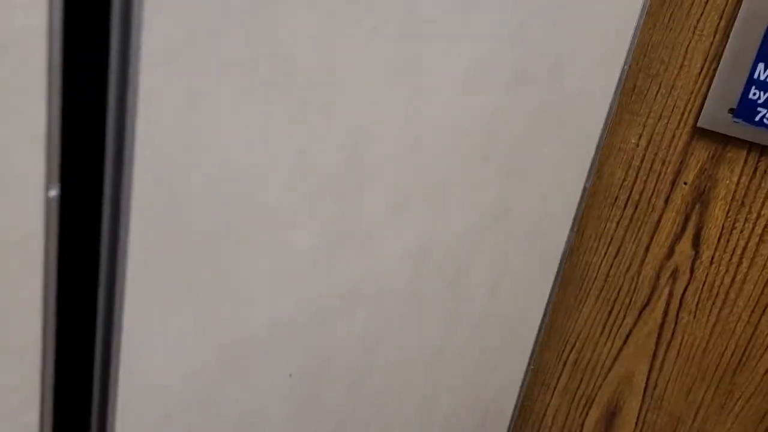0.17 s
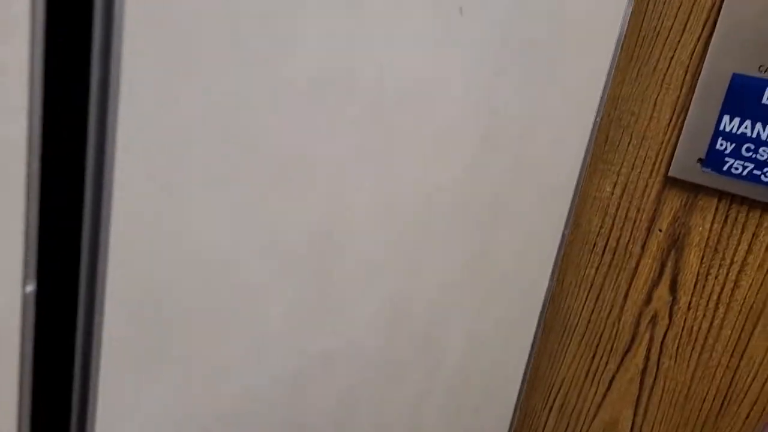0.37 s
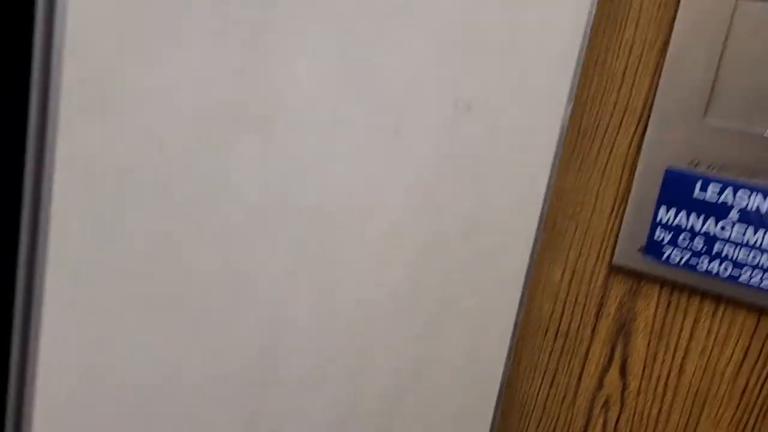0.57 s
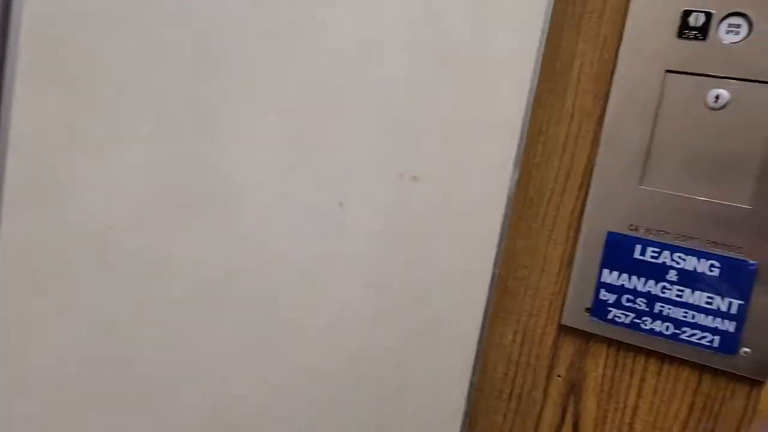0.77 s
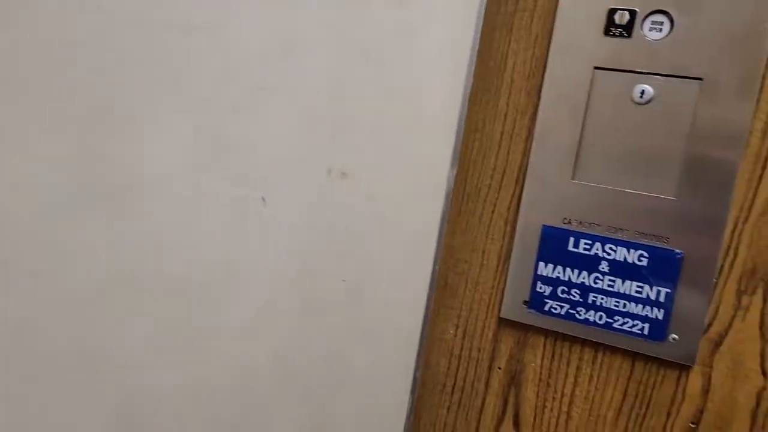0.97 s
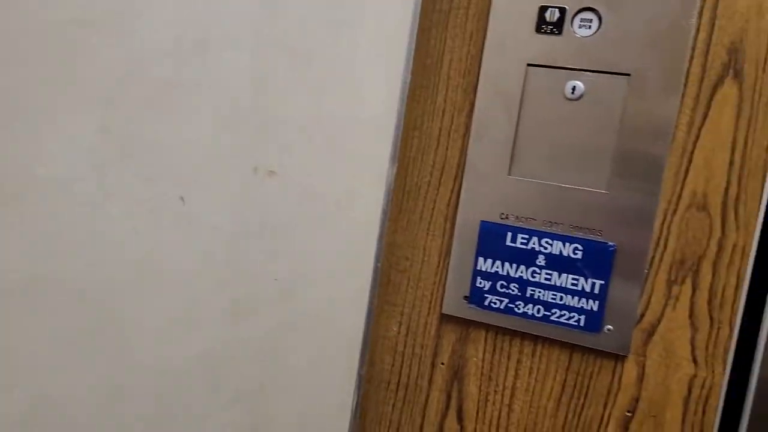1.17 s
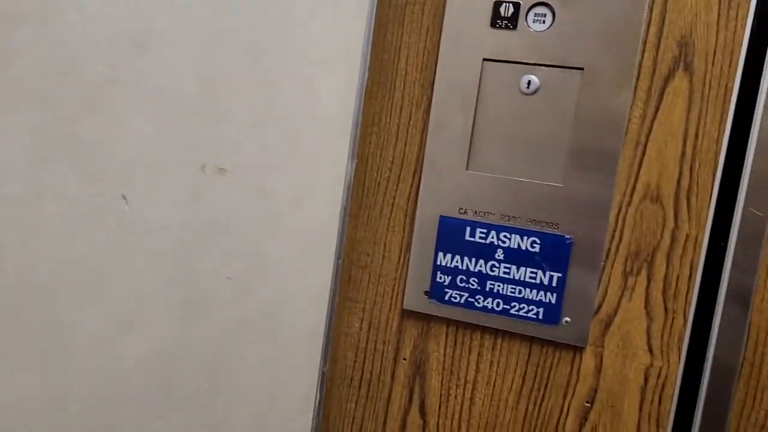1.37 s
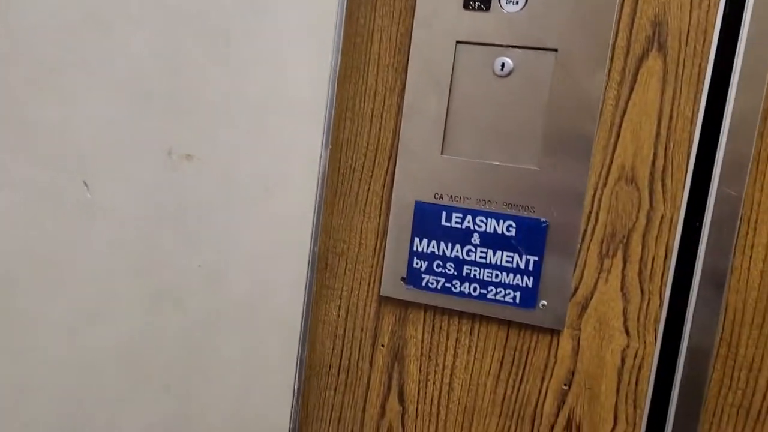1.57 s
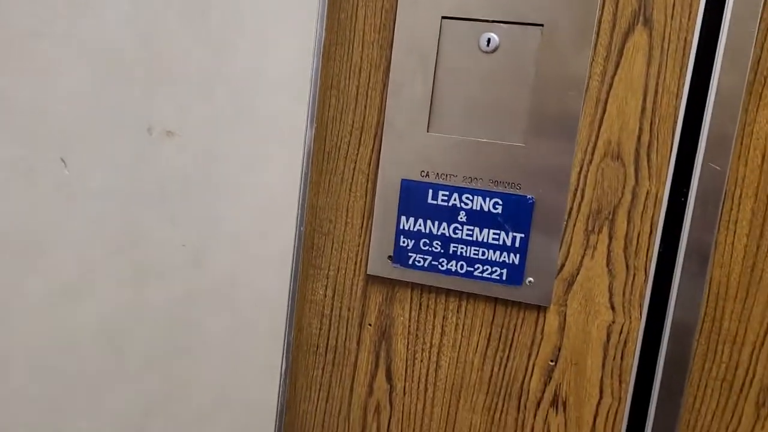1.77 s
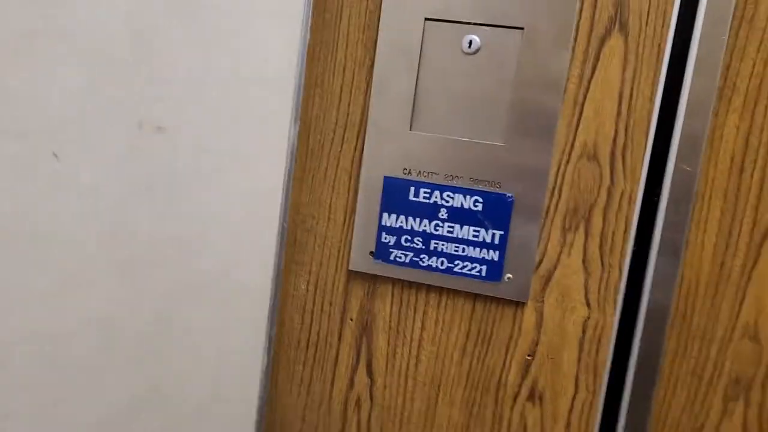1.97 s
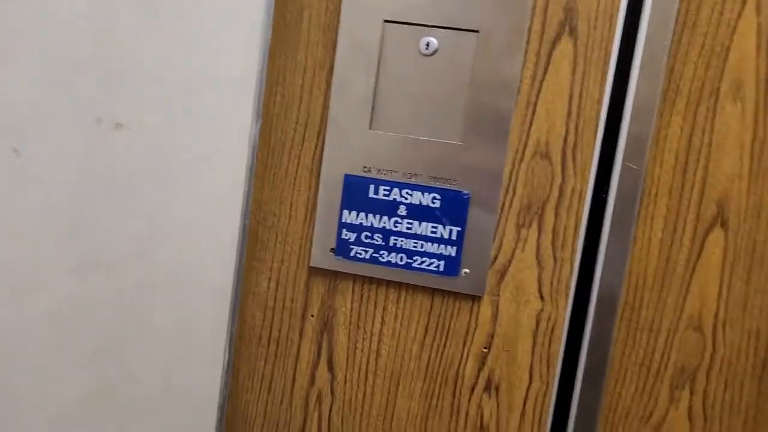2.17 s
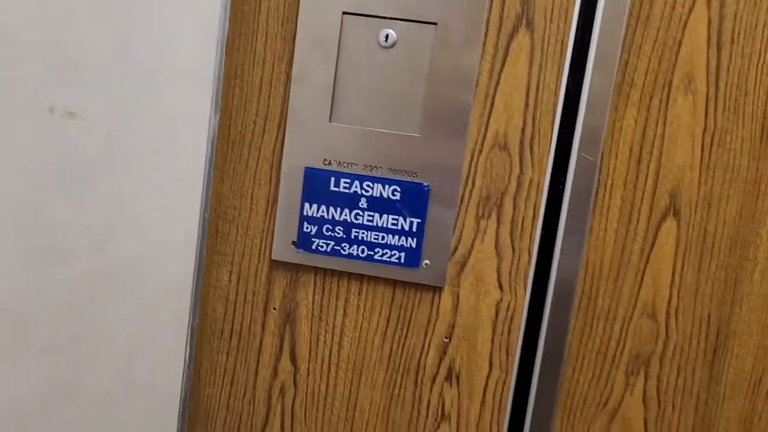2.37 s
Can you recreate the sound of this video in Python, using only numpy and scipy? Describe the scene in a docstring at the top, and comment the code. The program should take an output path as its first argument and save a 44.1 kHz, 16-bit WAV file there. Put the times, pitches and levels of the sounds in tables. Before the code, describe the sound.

Inside an old lift, door machinery grinds and bumps while steel parts clatter and rub, fades almost to nothing, then a tiny squeak, a hard latch snap and a steady hoist hum with faint relay clicks, heard on a handheld stereo microphone.

```python
"""Inside an old lift cabin: the door drive, then the hoist motor, rumble unevenly: bumps over a grind
excite wall panel resonances, above a deep filtered-noise shaking of the cabin.
Latches and door leaves clack and rattle as decaying noise, striking modes of a faintly ringing steel rail;
dull knocks and relay thumps push low modes; parts rub and squeak as filtered noise.
A hand-held recorder with two spaced, unequal ports hears it over a faint hiss."""
import sys
import numpy as np
from scipy import signal
from scipy.fft import rfft, irfft
from scipy.io import wavfile
from scipy.ndimage import uniform_filter1d

SR = 44100
rng = np.random.default_rng(int(sys.argv[2]) if len(sys.argv) > 2 else 0)


def linear_from_db(decibels):
    """Turn decibels (scalar or array-like) into linear amplitude factors; 0 gives 1."""
    return 10 ** (np.asarray(decibels, float) / 20)


def store_wav(level_fs):
    """Save 16-bit WAV to argv[1]."""
    pcm = np.round(np.clip(np.atleast_2d(level_fs), -1, 1) * 32767)
    wavfile.write(sys.argv[1], SR, pcm.T.astype(np.int16))


N = 105840
T = np.arange(N) / SR


def unit(x):
    """Scale to rms 1."""
    return x / np.sqrt(np.mean(x ** 2) + 1e-30)


def colour(x, points, tilt_db_per_octave=0.):
    """Filter by (Hz, dB) points and a tilt about 2 kHz."""
    points = np.array(points, float)
    f_hz = np.maximum(np.fft.rfftfreq(x.shape[-1], 1 / SR), 1)
    gain_db = np.interp(np.log(f_hz), np.log(np.maximum(points[:, 0], 1)), points[:, 1])
    gain_db = gain_db + tilt_db_per_octave * np.log2(f_hz / 2000)
    return irfft(rfft(x) * linear_from_db(gain_db), x.shape[-1])


def curve(table, column):
    """One column over time, interpolated."""
    rows = np.array(table)
    return np.interp(T, rows[:, 0], rows[:, column])


def walk(rate_hz):
    """Slow random wander of rms 1."""
    k = int(SR / rate_hz)
    steps = np.repeat(rng.standard_normal(N // k + 1), k)
    return unit(uniform_filter1d(steps, k)[:N])


PORT_LAG_S, APART_HZ = 0.0003926, 704
BASS_ALIKE, DIRECT = 0.96, 0.11  # shared power, 0-1: in the bass, higher up


def field(size=N, direct=DIRECT):
    """Noise at two ports: alike in the bass, higher up a direct part late at left plus unrelated reflections."""
    f_hz = np.fft.rfftfreq(size, 1 / SR)
    shared, left, right = rfft(rng.standard_normal((3, size)))
    alike = np.clip(direct + (BASS_ALIKE - direct) / (1 + (f_hz / APART_HZ) ** 2), 0, 1)
    late = np.exp(-2j * np.pi * f_hz * PORT_LAG_S)
    arrivals = shared * np.array([late, np.ones_like(late)])
    reflections = np.array([left, right])
    return irfft(np.sqrt(alike) * arrivals + np.sqrt(1 - alike) * reflections, size)


def ring(x, hz, width_hz):
    """Resonance with gain 1 at the centre."""
    return signal.lfilter(*signal.iirpeak(hz, hz / width_hz, SR), x)


def strike(x, modes):
    """Decaying sines excited by x; neighbouring modes swing in opposite senses."""
    out = 0
    for k, (hz, level_db, t60_s) in enumerate(modes):
        pole = np.exp(2j * np.pi * hz / SR - np.log(1000) / (t60_s * SR))
        out = out + (-1) ** k * linear_from_db(level_db) * signal.lfilter([1], [1, -pole], x).imag
    return out


WAVER, WAVER_RATE_HZ = .009, 9  # rms share of the centre frequency


def hum(x, hz, half_width_hz):
    """Steep resonance of two stages, the second half as wide; its centre may move and wavers."""
    turn = np.exp(2j * np.pi * np.cumsum(hz * (1 + WAVER * walk(WAVER_RATE_HZ))) / SR)
    x = x / turn  # shift the centre to 0 Hz
    for w in (half_width_hz, half_width_hz / 2):
        pole = np.exp(-2 * np.pi * w / SR)
        x = signal.lfilter([1 - pole], [1, -pole], x)
    return 2 * (x * turn).real


STEADY, STEADY_S = .75, .061  # share of each swell removed in dB, averaging window


def steady(x):
    """Even out the swells of a resonant hum, rms 1."""
    power = uniform_filter1d(np.mean(x ** 2, axis=0), int(STEADY_S * SR)) + 1e-30
    return unit(x / power ** (STEADY / 2))


DRIVE_EVENTS, BUMP_S = 200, .0022


def machine(levels, panels, bump_rate_hz, jitter, scatter_db, bump_over_grind_db):
    """One bump per turn over a steady grind shakes groups of panel resonances."""
    chance = rng.standard_normal((DRIVE_EVENTS, 2))
    at_s = np.cumsum((1 + jitter * chance[:, 0]) / bump_rate_hz)
    inside = at_s < N / SR
    bumps = np.zeros(N)
    bumps[(at_s[inside] * SR).astype(int)] = linear_from_db(scatter_db * chance[inside, 1])
    pulse = np.hanning(int(BUMP_S * SR)) * 2 / (BUMP_S * SR)
    push = field() + linear_from_db(bump_over_grind_db) * np.convolve(unit(bumps), pulse, "same")
    out = 0
    for column, group in enumerate(panels, start=1):
        panel_hum = sum(linear_from_db(db) * hum(push, hz, width) for hz, width, db in group)
        out = out + linear_from_db(curve(levels, column)) * steady(panel_hum)
    running = 1. * ((T >= levels[0][0]) & (T <= levels[-1][0]))
    return uniform_filter1d(running, size=441, mode="nearest") * out


# door drive level: time_s, low_db, middle_db, upper_db
DOOR_LEVELS = [(0.0, -49, -39.5, -54), (0.068, -46.5, -61, -63), (0.148, -56, -52.5, -56.5),
               (0.184, -61.5, -63.5, -74), (0.252, -38.5, -35.5, -40.5), (0.292, -36.5, -35, -40.5),
               (0.404, -40, -37, -43), (0.456, -36, -37.5, -45), (0.58, -49, -47, -60),
               (0.798, -50, -48.5, -57.5), (0.878, -43, -39, -44), (1.002, -47.5, -49, -58.5),
               (1.126, -55.5, -63.5, -73), (1.142, -58, -73.5, -68), (1.186, -66, -63.5, -75),
               (1.218, -55, -59.5, -69), (1.266, -56, -63.5, -70), (1.306, -63.5, -66, -78),
               (1.426, -69, -72.5, -83), (1.44, -64, -60, -61)]
# wall panel resonances, groups low, middle, upper: centre_hz, half_width_hz, relative_db
DOOR_PANELS = [
    [(116.04, 8.9, 3.5), (146.3, 9, -3.5)],
    [(182.4, 7.6, -4), (238.6, 14, -7), (260.7, 13, -2.5)],
    [(333, 26.4, 3), (388, 8.7, 3), (451, 22.3, -1.5), (482, 43, -4), (534, 178, -8.5)],
]
# middle hum sliding as the door moves: time_s, centre_hz
DOOR_SLIDE = [(0, 277), (.15, 266), (.3, 294), (.45, 279), (.6, 254), (.67, 266), (.72, 291), (.86, 286.6),
              (1.0, 278.4), (1.2, 244)]
SLIDE_HALF_WIDTH_HZ, SLIDE_RELATIVE_DB = 22, -1


def door_drive():
    """Door machinery bumps and grinds against the wall panels; one middle resonance slides with the door."""
    low, middle, upper = DOOR_PANELS
    slide = (curve(DOOR_SLIDE, column=1), SLIDE_HALF_WIDTH_HZ, SLIDE_RELATIVE_DB)
    return machine(DOOR_LEVELS, [low, middle + [slide], upper],
                   bump_rate_hz=28.5, jitter=0.04, scatter_db=2, bump_over_grind_db=-1.5)


# hoist motor level: time_s, low_db, upper_db
MOTOR_LEVELS = [(1.43, -83, -68), (1.45, -47.5, -58.5), (1.542, -51.5, -43), (1.566, -42, -38.5),
                (1.742, -56.5, -55.5), (1.824, -47.5, -50.5), (1.862, -53, -57.5), (1.91, -55, -53.5),
                (2.004, -50.5, -49.5), (2.224, -57.5, -47), (2.274, -48.5, -50.5), (2.35, -57.5, -54.5),
                (2.4, -52, -52.5)]
# resonances under the motor, groups low, upper: centre_hz, half_width_hz, relative_db
MOTOR_PANELS = [
    [(111.8, 8.6, 3.5), (143.3, 8.4, 0.43), (180, 4.8, 2.5)],
    [(240, 5.5, -14), (269.3, 19, -6), (290, 29, 1), (328.4, 37.6, -1), (382, 21, -10), (427.6, 20, -5.5),
     (497, 52, -8.5), (627, 39, -18)],
]


def hoist_motor():
    """Motor turns bump the panels more strongly than its grind, at a nearly even rate."""
    return machine(MOTOR_LEVELS, MOTOR_PANELS,
                   bump_rate_hz=24.1, jitter=.012, scatter_db=3, bump_over_grind_db=4)


# deep shaking of the cabin: time_s, level_db
SHAKE_LEVELS = [(0.0, -50), (0.09, -57), (0.13, -54.5), (0.19, -63), (0.31, -33.5), (0.35, -39.5),
                (0.65, -52.5), (0.71, -46), (1.21, -57.5), (1.23, -52.5), (1.42, -72.5), (1.58, -39),
                (1.61, -49.5), (1.88, -52.5), (1.9, -50.5), (2.29, -59.5), (2.35, -70.5), (2.4, -69.5)]
# shaking spectrum: frequency_hz, relative_db
SHAKE_COLOUR = [(8.8, 6), (15, 4.5), (43, 4.5), (59, 3.5), (81, -15), (95, -16), (120, -39.5), (210, -120)]
SHAKE_APART_DB = -11  # unrelated noise added per port, re the field


def shake():
    """Deep shaking, a little of it different at each port."""
    noise = field() + linear_from_db(SHAKE_APART_DB) * rng.standard_normal((2, N))
    return linear_from_db(curve(SHAKE_LEVELS, column=1)) * steady(colour(noise, SHAKE_COLOUR))


# clacks: start_s, level_db, mid_t60_s, tilt_db_per_octave, ring_relative_db, tick_relative_db,
# ringing_part, left_minus_right_db
CLACKS = [(0, -57.5, 0.5, -2.5, -4, 1, "rail", 0), (0.092, -58.5, 0.61, 4.5, -23, 2, "latch", 3),
          (.115, -48, 0.48, -10, -16, 4, "latch", 1.5), (.221, -40.5, 0.47, 1, 11, -9, "rail", -3.5),
          (.228, -46.5, 0.7, -2, 15, -3, "rail", -4), (.246, -42.5, 0.35, 0, 14.5, -8, "rail", 3),
          (.281, -37.5, 0.71, -3, 0.5, 0, "rail", -0.5), (.468, -51, 0.95, 0, -23, 6, "latch", -0.5),
          (0.606, -61.5, 0.43, -2.5, -28, 9.5, "latch", -4), (.666, -50, 0.44, -1.5, -20, 7, "latch", -0.5),
          (0.77, -63, 0.84, 0, -12, -11, "latch", -6.5), (.795, -50.5, 0.18, -5.5, -13, -4.5, "latch", 3),
          (0.812, -43, 0.85, -2, 13, 8, "latch", 0), (.848, -38, 0.48, -3, -2, -5.5, "rail", -0.5),
          (.866, -48, 0.73, 1, -8.5, -2.5, "latch", -2.5), (1.437, -60, 0.83, 0, -2.5, 6.5, "latch", -1.5),
          (1.466, -55.5, 1, 4, -19, 7, "latch", -0.5), (1.51, -53, 0.72, 0, -20.5, -3, "latch", -0.5),
          (1.54, -31, 0.39, 3.5, -13, 2.5, "latch", -1.5), (1.565, -37.5, 0.4, -4.5, -33, -10, "latch", 0),
          (1.884, -69.5, 0.7, 3, -10, 16.5, "latch", -2), (2.195, -70, 0.52, -6.5, -8, 12.5, "latch", 3.5)]
# clack spectrum: frequency_hz, relative_db
CLACK_COLOUR = [(210, -69), (350, -17.5), (664, -8), (1260, -4), (1630, -8.5), (2100, -7), (2350, -8),
                (6970, -14), (9590, -19.5), (15000, -21.5), (16000, -71.5)]
# modes of each steel part: frequency_hz, relative_db, t60_s
PARTS = {"rail": [(2053, 2, 0.17), (2096, 3.5, .18), (2204, 5, .06), (2800, -0.5, 0.042), (3040, -6, 0.062),
         (4740, -4.5, .05), (6901, -14.5, .15), (7510, -11.5, 0.14), (10290, -17, 0.19)],
         "latch": [(940, 5, 0.084), (1203, -4.5, .05), (2095, -2.5, 0.089), (3060, -2, 0.11),
         (3901, 8.5, 0.15), (4683, -8.5, 0.046), (7840, -5, .03)]}
RISE_S, TICK_S, TICK_TOP_HZ = 0.0017, 0.0012, 9000
BASS_HZ, BASS_STAY, TREBLE_FADE = 1285, 1.38, 0.56  # t60 factors
DROP_DB_PER_S2 = 292.5  # tails fall ever faster
RATTLE_DB, RATTLE_RATE_HZ = 1, 150
BLOW_DB, SCUFF_DB, SCUFF_DECAY_S, SCUFF_DIRECT = -12, -8.5, 0.0055, 0.23


def ring_drive(size):
    """A clean blow at each port's arrival and the scuff after it set the steel ringing."""
    arrival = [[round(PORT_LAG_S * SR)], [0]]
    blow = linear_from_db(BLOW_DB) * (np.arange(size) == arrival)
    fade = np.exp(-np.arange(size) / SR / SCUFF_DECAY_S) / np.sqrt(SCUFF_DECAY_S * SR)
    return blow + linear_from_db(SCUFF_DB) * field(size, SCUFF_DIRECT) * fade


def clacks():
    """Each clack: a tick, a rattling decay whose treble fades first and bass last, and a ringing steel part."""
    size = 32768
    out = np.zeros((2, N + SR))
    t = np.arange(size) / SR
    rattle = np.resize(linear_from_db(RATTLE_DB * walk(RATTLE_RATE_HZ)), N + SR)
    for start_s, level_db, t60_s, tilt, ring_db, tick_db, part, pan_db in CLACKS:
        i = int(start_s * SR)
        noise = unit(colour(field(size), CLACK_COLOUR, tilt))
        dull = signal.lfilter(*signal.butter(1, 4000, fs=SR), noise)
        bass = signal.lfilter(*signal.butter(2, BASS_HZ, fs=SR), dull)
        bands = ((bass, BASS_STAY), (dull - bass, 1), (noise - dull, TREBLE_FADE))
        body = sum(band * linear_from_db(-60 * t / (t60_s * stay)) for band, stay in bands)
        body = body * linear_from_db(-DROP_DB_PER_S2 * t ** 2)
        body = body * np.minimum(t / RISE_S, 1) * rattle[i:i + size]
        tick = signal.lfilter(*signal.butter(2, TICK_TOP_HZ, fs=SR), noise)
        tick = linear_from_db(tick_db) * tick * np.exp(-t / TICK_S)
        steel = linear_from_db(ring_db) * strike(ring_drive(size), PARTS[part])
        port_db = level_db + np.array([[pan_db], [-pan_db]]) / 2
        out[:, i:i + size] += linear_from_db(port_db) * (body + tick + steel)
    return out[:, :N]


def soft_pushes(rows, modes):
    """Smooth contact pulses excite low modes, alike at both ports."""
    push = np.zeros(N)
    for start_s, level_db, contact_s in rows:
        i, k = int(start_s * SR), int(contact_s * SR) + 2
        push[i:i + k] += linear_from_db(level_db) * np.hanning(k) * 2 / k
    return strike(push, modes)


# dull knocks on the panels: start_s, level_db, contact_s
KNOCKS = [(0.265, -35.5, 0.0059), (0.281, -23, 0.0037), (.307, -21.5, 0.0033), (1.548, -32.5, 0.0017)]
# panel modes: frequency_hz, relative_db, t60_s
KNOCK_MODES = [(48.6, -4.5, .12), (124, -2.5, 0.064), (187, -7, 0.095), (294.5, -0.5, 0.072),
               (398, 1.5, 0.044), (487, 3, 0.036), (681, 4.5, 0.018)]


def knocks():
    """Soft contacts push the panels' low modes."""
    return soft_pushes(KNOCKS, KNOCK_MODES)


# relay box thumps: start_s, level_db, contact_s
THUMPS = [(1.883, -35.5, 0.0013), (2.197, -48, .0014)]
# relay box modes: frequency_hz, relative_db, t60_s
THUMP_MODES = [(290, 1.5, 0.048), (410, 0, 0.044), (512, -2, .025)]


def thumps():
    """Short contacts push the quickly damped modes of a relay box."""
    return soft_pushes(THUMPS, THUMP_MODES)


# rubbing between the knocks: time_s, level_db, tilt_db_per_octave, singing_db
RUB_LEVELS = [(0, -67, 5, -98), (.2, -61.5, 4.5, -69), (.4, -56, 1, -58), (.45, -62.5, 10.5, -91),
              (.56, -65, 4, -70), (.76, -68, 5.5, -80), (.9, -46, -9, -77), (1.04, -62, 0, -67.5),
              (1.18, -73, 1.5, -73.5), (1.25, -84.5, -11, -81.5), (1.42, -113, -6, -90.5),
              (1.6, -97, -13.5, -101), (1.75, -108, 2, -102), (1.87, -100, -3, -87.5),
              (1.9, -62.5, 1.5, -89), (1.98, -62, 1, -74.5), (2.07, -61.5, 1, -82),
              (2.17, -67.5, 1.5, -88.5), (2.21, -73.5, 6.5, -97), (2.31, -78, -2.5, -100.5),
              (2.4, -102, -10, -108)]
# rubbing spectrum: frequency_hz, relative_db
RUB_COLOUR = [(470, -30), (800, 2.5), (1050, -4), (1400, 1), (1740, -3.5), (2070, 0.5), (2770, -6.5),
              (3600, -23.5), (3900, -8), (4400, -13.5), (5500, -15), (7000, -18.5), (14800, -29.5),
              (16000, -51.5)]
RUB_GRAIN_DB, RUB_GRAIN_RATE_HZ = 1.5, 60.4
SING_HZ, SING_WIDTH_HZ = 2100, 120  # width of the narrower stage


def rub():
    """Grainy friction whose colour tilts; it keeps the rail singing."""
    grain = linear_from_db(RUB_GRAIN_DB * walk(RUB_GRAIN_RATE_HZ))
    noise = unit(colour(field(), RUB_COLOUR)) * grain
    level_db, tilt = curve(RUB_LEVELS, column=1), curve(RUB_LEVELS, column=2)
    friction = 0
    for hz in 500 * 2. ** np.arange(6):  # octave bands
        edges_hz = [hz / np.sqrt(2), min(hz * np.sqrt(2), 20000)]
        band = signal.sosfilt(signal.butter(2, edges_hz, "bandpass", fs=SR, output="sos"), noise)
        friction = friction + band * linear_from_db(level_db + tilt * np.log2(hz / 2000))
    sing = unit(ring(ring(field(), SING_HZ, SING_WIDTH_HZ), SING_HZ, 2 * SING_WIDTH_HZ))
    return friction + sing * linear_from_db(curve(RUB_LEVELS, column=3))


SQUEAK_HZ, SQUEAK_WIDTH_HZ, SQUEAK_DB = 3750, 450, -60  # width of the narrower stage
SQUEAK_START_S, SQUEAK_HOLD_END_S, SQUEAK_DECAY_S = 1.452, 1.485, 0.016


def squeak():
    """A short narrow noise band, held then decaying, before the door latches."""
    shape = (T >= SQUEAK_START_S) * np.exp(-np.maximum(T - SQUEAK_HOLD_END_S, 0) / SQUEAK_DECAY_S)
    narrow = ring(ring(field(), SQUEAK_HZ, SQUEAK_WIDTH_HZ), SQUEAK_HZ, 2 * SQUEAK_WIDTH_HZ)
    return linear_from_db(SQUEAK_DB) * shape * unit(narrow)


def scene():
    """Everything in the cabin."""
    machines = door_drive() + hoist_motor() + shake()
    impacts = clacks() + knocks() + thumps()
    return machines + impacts + rub() + squeak()


def band_limit(x):
    """A steep low-pass at the top of the band."""
    return signal.sosfilt(signal.butter(12, 16800, fs=SR, output="sos"), x)


# port response difference: frequency_hz, left_minus_right_db
PORT_BALANCE = [(60, -1), (110, 1), (200, 4.5), (380, -1.5), (700, -0.5), (1290, 0.5), (2380, -0.5),
                (4400, 1), (8120, -1), (15000, 6.5)]
# hiss spectrum: frequency_hz, relative_db
HISS_COLOUR = [(350, -37.5), (600, -7), (1450, -0.5), (1640, -3.5), (2070, -2), (2370, -7.5),
               (16000, -11.5)]
HISS_DB = -82


def record(dry):
    """Unequal ports colour the sound, with unrelated hiss in each channel."""
    half = np.array(PORT_BALANCE) * [1, .5]
    ports = np.array([colour(dry[0], half), colour(dry[1], half * [1, -1])])
    hiss = linear_from_db(HISS_DB) * unit(colour(rng.standard_normal(dry.shape), HISS_COLOUR))
    mix = ports + hiss
    return band_limit(mix)


dry = scene()
out = record(dry)
store_wav(out)
```